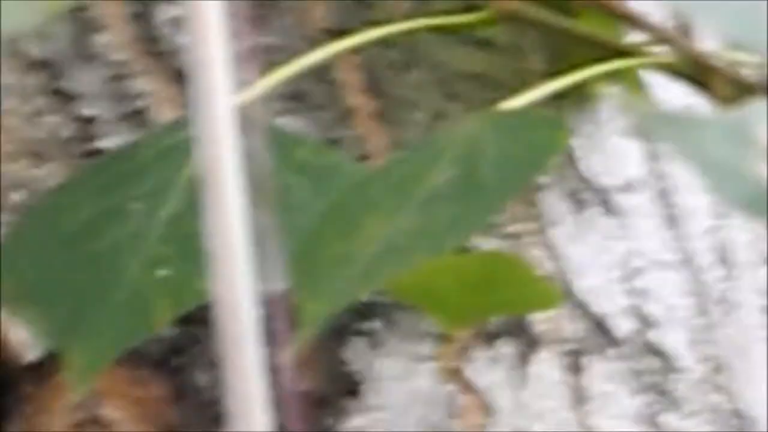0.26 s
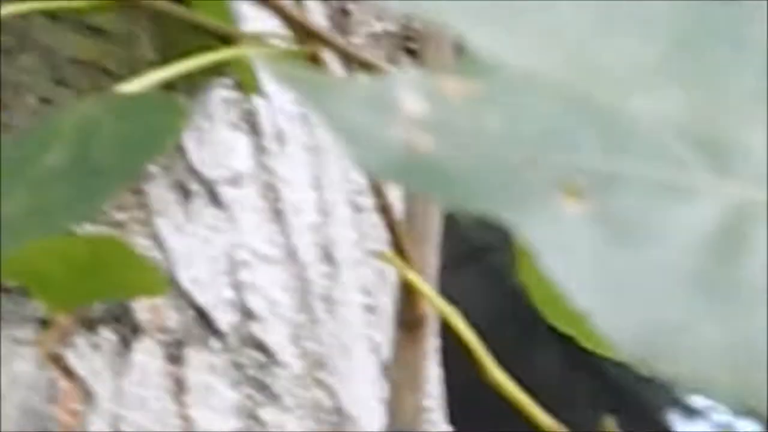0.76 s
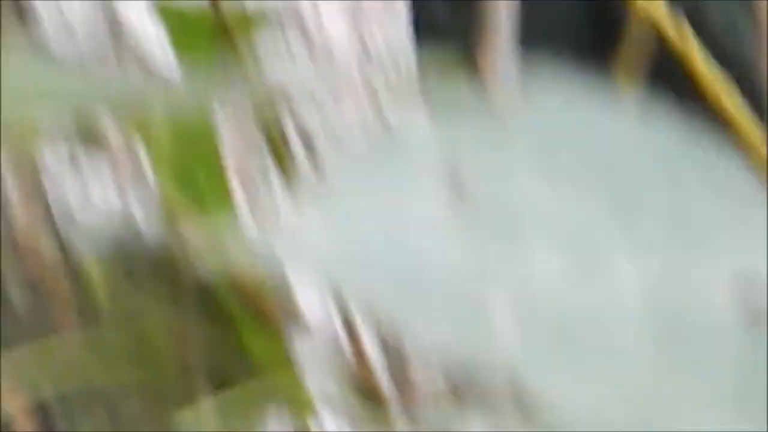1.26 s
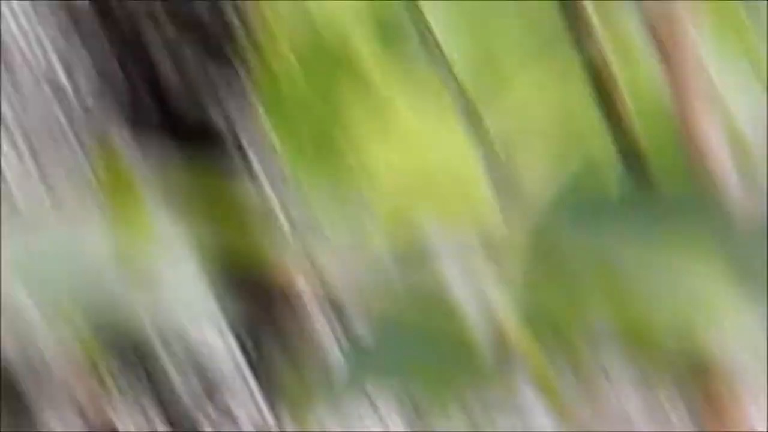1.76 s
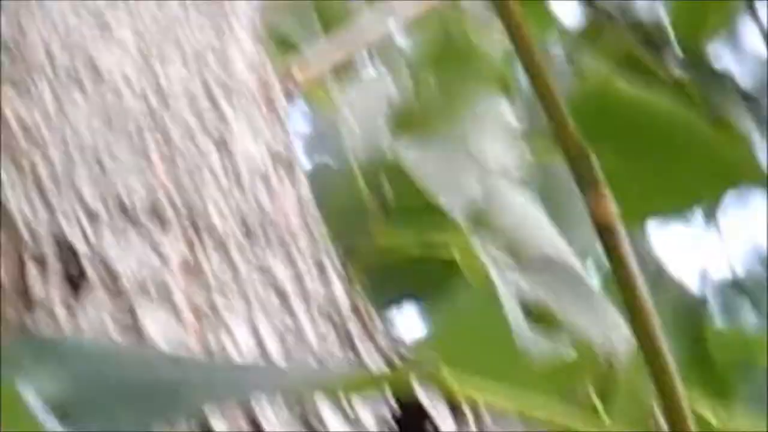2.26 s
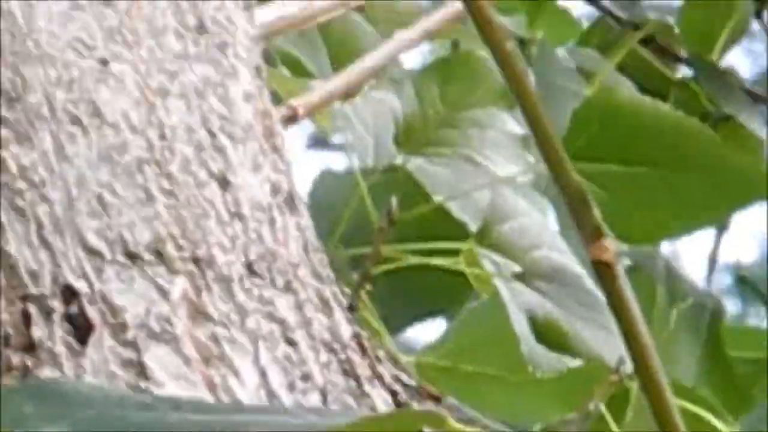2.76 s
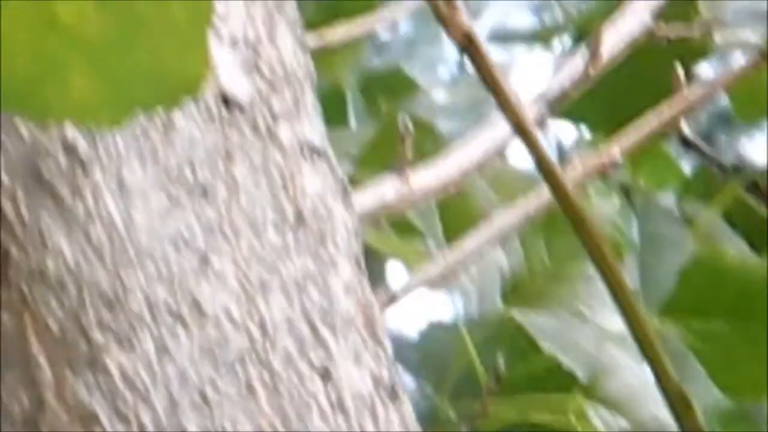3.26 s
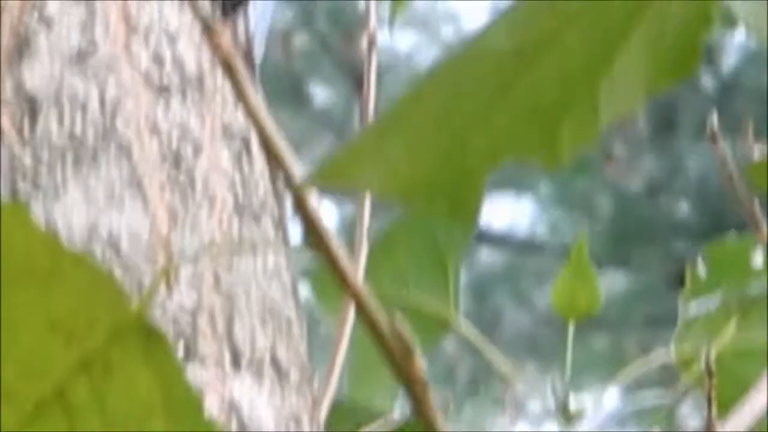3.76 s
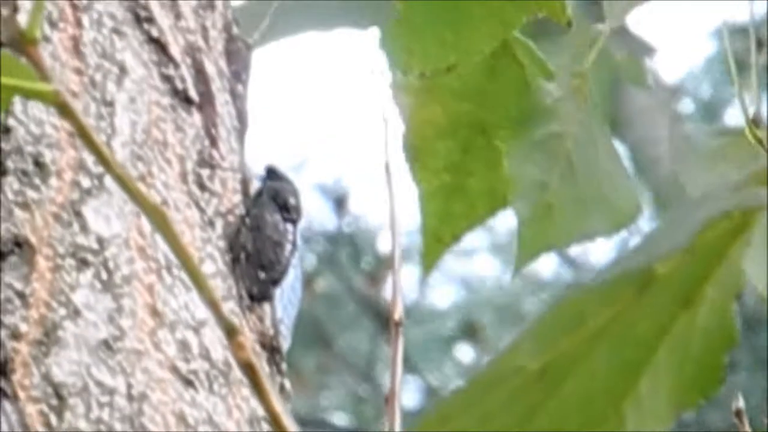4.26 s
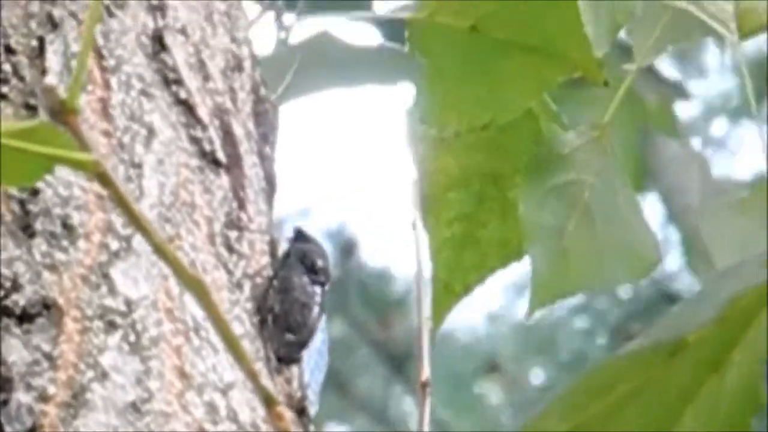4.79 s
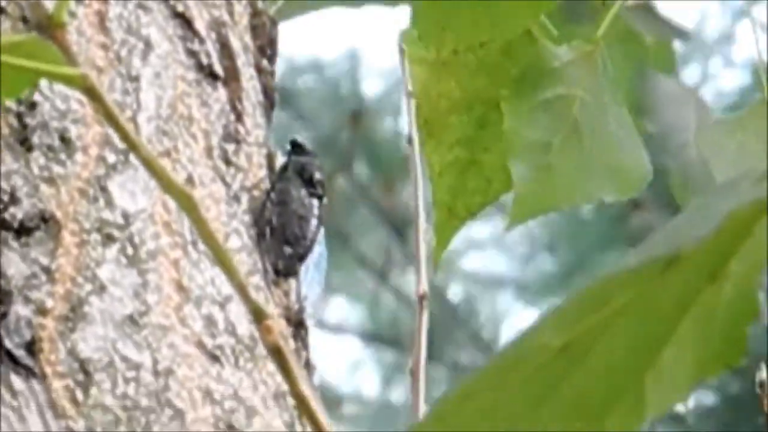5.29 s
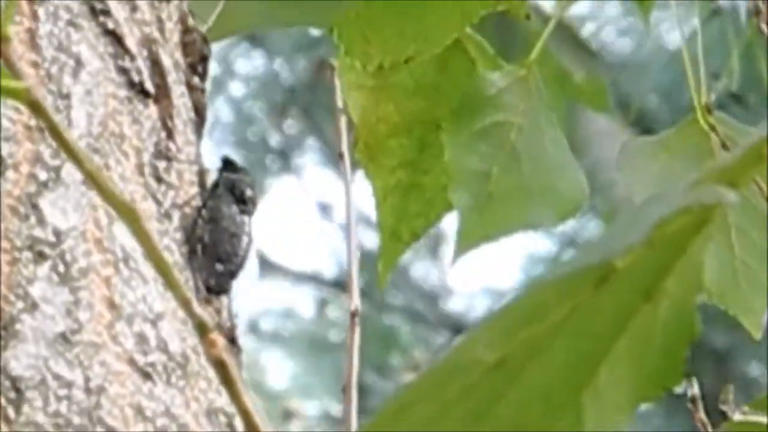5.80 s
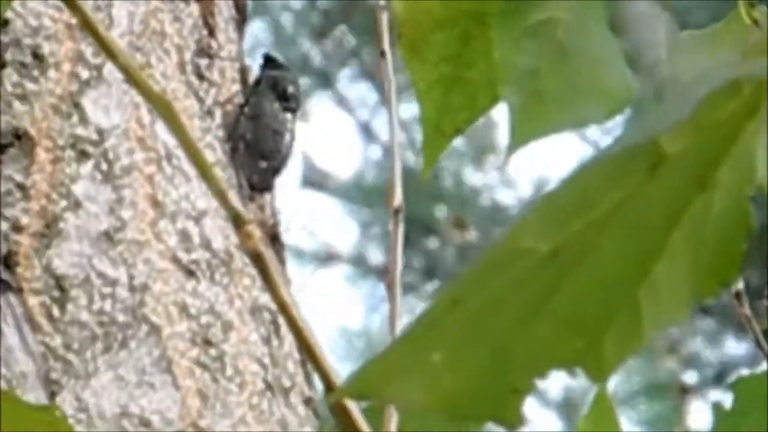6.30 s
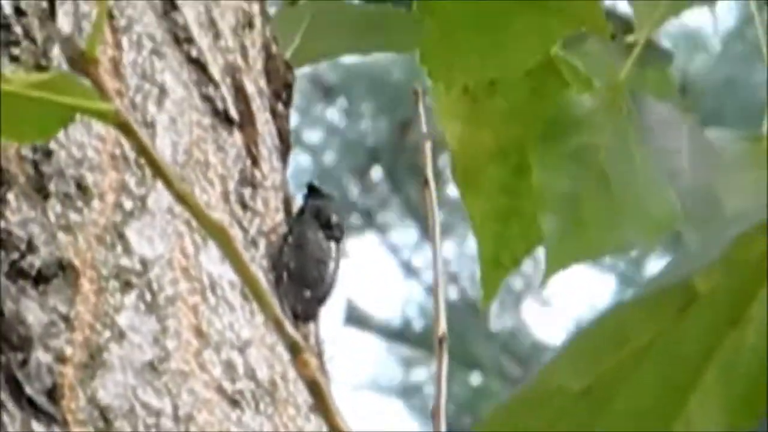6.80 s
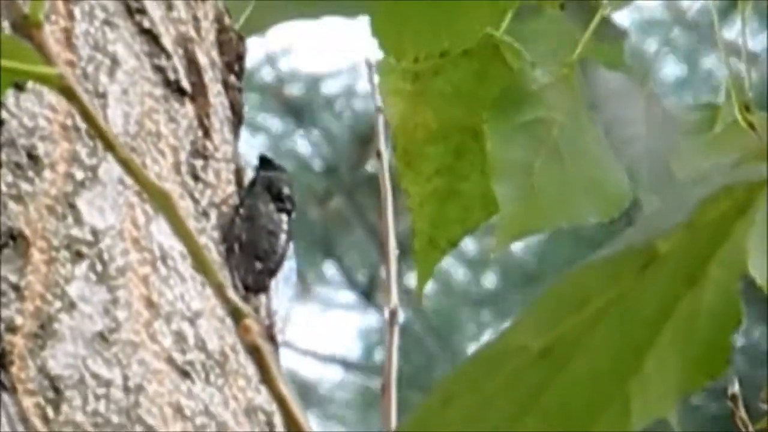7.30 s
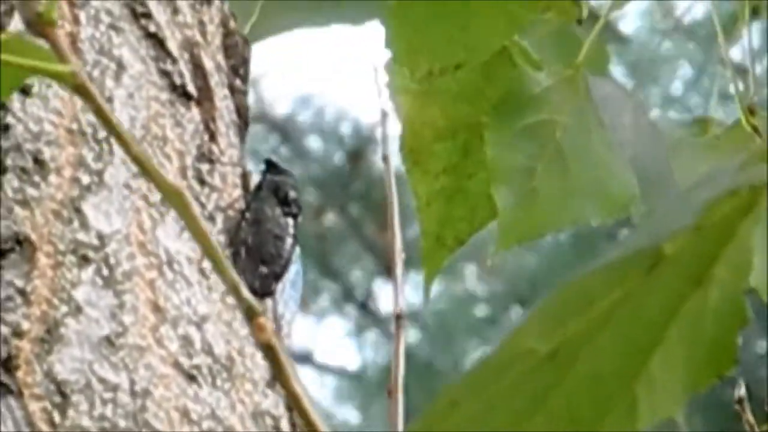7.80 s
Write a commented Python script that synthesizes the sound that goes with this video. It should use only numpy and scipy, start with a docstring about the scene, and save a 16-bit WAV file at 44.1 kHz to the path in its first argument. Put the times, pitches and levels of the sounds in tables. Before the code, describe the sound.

Outdoors by a leafy tree, distant traffic rumbles and far insects hiss and whine while fingers bump the small hand-held stereo microphone. A single cicada's raspy buzz rises through them in rapid pulses, each made of fast dry clicks that quicken and break off. After three seconds it is dominant, piercing and steady, with short dense reflections from trunk and leaves, and it never stops.

```python
"""Cicada on a tree trunk

A cicada swells into a throbbing buzz over a far trilling insect chorus and the roar of distant traffic.
Each throb is a train of paired drum-membrane clicks, ringing fixed modes, that speeds up and then breaks off.
Chorus and traffic are filtered noise; trunk and leaves add short, dense echoes to the song.
A small hand-held stereo microphone turns towards the tree and picks up handling thumps: knocks of ringing noise."""
import sys
import numpy as np
from scipy import signal
from scipy.fft import rfft, irfft
from scipy.io import wavfile
from scipy.ndimage import uniform_filter1d, map_coordinates

SR = 44100
rng = np.random.default_rng(int(sys.argv[2]) if len(sys.argv) > 2 else 0)


def undo_db(level):
    """Turn decibels back into plain size, where 20 dB means ten times bigger."""
    steps = np.asarray(level, float) / 20
    return 10 ** steps


def store_wav(level_fs):
    """Save 16-bit WAV to argv[1]."""
    pcm = np.round(np.clip(np.atleast_2d(level_fs), -1, 1) * 32767)
    wavfile.write(sys.argv[1], SR, pcm.T.astype(np.int16))


N = 355005
TIME_S = np.arange(N) / SR
FFT_HZ = np.fft.rfftfreq(N, 1 / SR)


def rms_one(x):
    """Scale to unit rms."""
    return x / np.sqrt(np.mean(x ** 2) + 1e-20)


def along(rows, at):
    """Read every column of a table at the given places of its first column."""
    first, *columns = np.transpose(rows)
    return [np.interp(at, first, c) for c in columns]


def at_hz(points, hz):
    """Read a spectrum on a log-frequency axis."""
    point_hz, value = np.array(points).T
    return np.interp(np.log(hz + 1), np.log(point_hz + 1), value)


def drift(rate_hz):
    """Slow random wander of rms 1: noise through two equal low-pass poles, computed every 40 samples."""
    r = np.exp(-80 * np.pi * rate_hz / SR)
    noise = rng.standard_normal(N // 40 + 2002)
    slow = signal.lfilter([1], [1, -2 * r, r * r], noise)[2000:]   # drop the filter's run-in
    return np.interp(np.arange(N) / 40, np.arange(len(slow)), rms_one(slow))


def resonance(x, hz, width_hz):
    """Two-pole resonance with a gain of 1 at its peak."""
    r = np.exp(-np.pi * width_hz / SR)
    poles = [1, -2 * r * np.cos(2 * np.pi * hz / SR), r * r]
    return signal.lfilter([(1 - r * r) / 2, 0, (r * r - 1) / 2], poles, x + 1e-18)


def coloured_noise(spectrum):
    """Stereo noise of a given spectrum, most alike in the bass and nearly unrelated in the treble; rms 1."""
    # how alike left and right are: (frequency [Hz], likeness [0-1])
    likeness = [(60, 0.78), (600, 0.72), (1000, 0.54), (1400, 0.29), (2200, 0.22), (3200, 0.035),
                (16000, 0.16)]
    mid, side = rfft(rng.standard_normal((2, N)))
    alike = np.clip(at_hz(likeness, FFT_HZ), 0, 1)
    pair = np.sqrt(1 + alike) * mid + np.sqrt(1 - alike) * side * [[1], [-1]]
    return rms_one(irfft(pair * undo_db(at_hz(spectrum, FFT_HZ)), N))


def distant_traffic():
    """Gusting rumble and unsteady roar of shaped noise, with an engine drone of resonant noise bands."""
    # sinking as the song swells, before gusts: (time [s], rumble [dB], roar [dB])
    background_levels = [(0, -48, -36), (.36, -45.5, -37.5), (.7, -47.5, -36.5), (1.5, -45, -35.5),
                         (2.5, -44.5, -36.5), (3.2, -45.5, -35.5), (3.8, -51, -37.5), (4.6, -53.5, -39.5),
                         (5.2, -53.5, -38.5), (6, -54.5, -40), (6.5, -52, -39.5), (7.6, -55.5, -39.5),
                         (7.76, -47, -38), (8.05, -53, -40)]
    # rumble spectrum: (frequency [Hz], relative level per Hz [dB])
    rumble_spectrum = [(12, -41), (20, -28), (54, 3.5), (86, -8), (110, -6.5), (140, -18), (240, -120)]
    # roar spectrum: (frequency [Hz], relative level per Hz [dB])
    roar_spectrum = [(53, -29), (90, -4.5), (120, -0.5), (152, -3), (245, -2), (372, -5), (533, -4.5),
                     (786, -3.5), (954, -1.5), (2370, -13.5), (3200, -14.5), (4160, -58), (7040, -120)]
    # engine drone bands: (centre [Hz], width [Hz], relative level [dB])
    drone_bands = [(520, 185, 0), (916, 170, -6.5)]
    # far sources; the drone column is used here:
    # (time [s], chorus hiss [dB], chorus whine [dB], engine drone gain [dB])
    drone_levels = [(0, -38, -39.5, -41.5), (.5, -37, -38.5, -41.5), (1, -36, -38, -40.5),
                    (1.5, -35, -36.5, -42.5), (2, -34, -37, -45.5), (3, -34, -36, -53.5),
                    (4, -36.5, -37, -58), (6, -40, -38, -52.5), (8.05, -41, -39, -66)]
    gust_db, gusts_hz = 2.5, 5.2   # rms depth and rate
    rumble_db, roar_db = along(background_levels, TIME_S)
    drone_db = along(drone_levels, TIME_S)[2]
    rumble = undo_db(rumble_db + gust_db * drift(gusts_hz)) * coloured_noise(rumble_spectrum)
    roar = undo_db(roar_db + 1.22 * drift(13.2)) * coloured_noise(roar_spectrum)
    drone = np.zeros(N)
    for hz, width_hz, band_db in drone_bands:
        band = rms_one(resonance(rng.standard_normal(N), hz, width_hz))
        drone += undo_db(band_db + 1.3 * drift(3.3)) * band
    return rumble + roar + undo_db(drone_db) * drone


def far_chorus():
    """Many far insects blur into shaped hiss and a narrow whine whose level flutters as a trill."""
    # chorus hiss spectrum: (frequency [Hz], relative level per Hz [dB])
    hiss_spectrum = [(2500, -17), (3500, -1.5), (5500, 1), (6800, 8), (8000, -10.5), (10000, 3),
                     (13000, -3.5), (15800, -20)]
    # far sources; the hiss and whine columns are used here:
    # (time [s], chorus hiss [dB], chorus whine [dB], engine drone gain [dB])
    chorus_levels = [(0, -38, -39.5, -41.5), (.5, -37, -38.5, -41.5), (1, -36, -38, -40.5),
                     (1.5, -35, -36.5, -42.5), (2, -34, -37, -45.5), (3, -34, -36, -53.5),
                     (4, -36.5, -37, -58), (6, -40, -38, -52.5), (8.05, -41, -39, -66)]
    whine_hz, stage_width_hz = 7320, 380
    hiss_db, whine_db, _ = along(chorus_levels, TIME_S)
    whine = resonance(rng.standard_normal((2, N)), whine_hz, stage_width_hz)
    whine = resonance(whine, whine_hz, stage_width_hz)
    hiss = undo_db(hiss_db) * coloured_noise(hiss_spectrum)
    return hiss + undo_db(whine_db + 1.1 * drift(40)) * rms_one(whine)


def thumps():
    """Short noisy knocks of fingers on the microphone body, each ringing one resonance."""
    # handling thumps, level before onset and decay, width of each of two filter stages:
    # (time [s], level [dB], resonance [Hz], t60 of the decay [s], width [Hz])
    knocks = [(.045, -30.5, 646, 0.12, 200), (.74, -30, 510, 0.11, 98), (1.1, -31, 1610, 0.12, 70),
              (1.48, -27, 65, 0.27, 15), (1.75, -30, 69.6, 0.13, 20), (2.045, -30, 520, 0.16, 140),
              (2.799, -29, 301, 0.092, 70), (3.34, -31, 630, 0.14, 450)]
    out = np.zeros(N)
    for start_s, knock_db, hz, t60_s, width_hz in knocks:
        i = round(start_s * SR)
        age = TIME_S[:min(12000, N - i)]
        knock = resonance(rng.standard_normal(len(age)), hz, width_hz)
        knock = resonance(knock, hz, width_hz)
        onset = np.minimum(age / 0.0038, 1)
        out[i:i + len(age)] += undo_db(knock_db - 60 * age / t60_s) * rms_one(knock) * onset
    return out


def leaf_echoes(song):
    """Dense short echoes off trunk and leaves, other ones at each port; they change as the leaves sway."""
    # colour of the echoes: (frequency [Hz], level against the direct sound [dB])
    echo_colour = [(3500, 1.5), (5000, -5.5), (6200, 2.5), (7200, -6.5), (8000, -7.5), (10000, -3.5),
                   (12000, -3.5), (15000, -0.5)]
    t60_s, delay_s, sway_hz = .035, .001, 1.0
    sway = np.pi / 2 * drift(sway_hz)
    song = irfft(rfft(song) * undo_db(at_hz(echo_colour, FFT_HZ)), N)
    age = np.arange(3000) / SR
    tails = rng.standard_normal((2, 2, len(age))) * undo_db(-60 * age / t60_s) * (age > delay_s)
    tails /= np.sqrt(np.sum(tails ** 2, axis=2, keepdims=True))
    echoes = np.zeros((2, N))
    # swaying shifts the song between two sets of echoes
    for share, tail in zip((np.cos(sway), np.sin(sway)), tails):
        echoes += signal.fftconvolve([song * share], tail, axes=1)[:, :N]
    return echoes


def turning_ports(song):
    """As the microphone turns, the song's arrival at the left port shifts against the right one."""
    # turn of the microphone: (time [s], delay of the song at the left port [microseconds])
    turn_delay = [(0, -34), (1.5, -21), (2.7, 13), (4, 17), (8.05, 22)]
    lag = along(turn_delay, TIME_S)[0] * SR / 1e6
    left = map_coordinates(song, [np.arange(N) - lag], order=5, mode="nearest")
    return np.array([left, song])


def cicada():
    """Membrane buckles in, springs out a moment later; both clicks ring the same modes with own strengths."""
    # pace of the song: (time [s], throbs begun so far [count])
    throb_count = [(-.061, 0), (.149, 2), (.38, 4), (.471, 5), (.884, 9), (1.077, 11), (1.282, 13),
                   (1.755, 18), (2.048, 21), (2.348, 24), (5.282, 55), (5.568, 58), (6.047, 63),
                   (6.727, 70), (7.124, 74), (8.143, 84)]
    # swell of the song: (time [s], level before the throb shape [dB], slump at the start of a throb [dB])
    song_swell = [(0, -35.5, -1), (.4, -33, -4.5), (.8, -32.5, -4), (1.3, -30.5, -5), (1.8, -27.5, -4.5),
                  (2.4, -26, -4.5), (2.8, -24.5, -5), (3.3, -23, -4), (4.3, -23.5, -3.5),
                  (5.4, -23.5, -3.3), (6.5, -23, -3.5), (8.05, -23, -2.5)]
    # clicks through one throb:
    # (phase [0-1], click pairs [1/s], gap inside a pair [ms], unsteadiness [share of a period])
    throb_clicks = [(0, 215, 1.7, .07), (.16, 215, 1.6, .06), (.28, 248, 1.42, .02), (.45, 270, 1.455, .01),
                    (.66, 286, 1.49, .01), (.75, 318, 1.505, .008), (.95, 358, 1.55, .01),
                    (1, 368, 1.55, .03)]
    # loudness through one throb: (phase [0-1], effort [dB], share of the slump [0-1], low modes [dB])
    throb_shape = [(0, -0.5, 1, 4), (.17, -1, 1, 2), (.3, -0.5, .2, -.5), (.4, -1, 0, 0.5),
                   (.65, -.5, 0, 0.5), (.8, 1, 0, 0), (.92, -0.07, 0.04, 1.5), (.97, -2, .1, 4),
                   (1, -4.5, .6, 7)]
    # upper membrane and air-sac modes: (frequency [Hz], width [Hz], buckling in [dB], springing out [dB])
    high_modes = [(6310, 210, -9.5, -11), (6670, 300, -1, -13), (7490, 1110, -0.5, -6), (8146, 920, 0.5, 0),
                  (9210, 730, -7.5, -1), (10240, 1100, -15.5, -11.5), (12700, 2900, -27, -19),
                  (14400, 1400, -20, -23), (15500, 900, -26, -25)]
    # lower modes: (frequency [Hz], width [Hz], buckling in [dB], springing out [dB])
    low_modes = [(3450, 530, -32, -31), (3730, 296, -16, -20.5), (4262, 246, -7.5, -16),
                 (4690, 510, -7.5, -17.5), (5190, 670, -8, -22), (5650, 560, -7.5, -24)]
    click_spread_db, mode_spread_db = 1.1, .8
    throb_spread_db, slump_spread_db = 0.52, 0.84
    rib_clicks_per_s, rib_db = 1500, -24   # level against the stronger main click
    skirt_hz = 4000   # high-pass below the upper modes
    low_growth, full_voice_db = 0.34, -20.5   # dB per dB of swell, and the level where it adds nothing

    phase, = along(throb_count, TIME_S)
    level_db, slump_db = along(song_swell, TIME_S)
    # each throb differs a little
    chance = rng.standard_normal((int(phase[-1]) + 1, 2))[phase.astype(int)]
    pairs_per_s, gap_ms, unsteady = along(throb_clicks, phase % 1)
    effort_db, slumped, low_db = along(throb_shape, phase % 1)

    pairs = np.cumsum(pairs_per_s * (1 + .012 * drift(5))) / SR
    inward = np.flatnonzero(np.diff(pairs.astype(int)))
    period_spread = (unsteady / pairs_per_s * SR)[inward, None]
    slip = rng.standard_normal((len(inward), 2)) * period_spread
    # a pair slips as a whole; its gap varies half as much, so the pair draws gliding fringes
    outward = inward + gap_ms[inward] * SR / 1000 + .5 * slip[:, 1]
    times = np.clip([inward, outward] + slip[:, 0], 0, N - 1).astype(int)
    size_db = click_spread_db * rng.standard_normal(times.shape)
    # ribs of the membrane snap one by one between the main clicks
    snaps = rng.random(N) < rib_clicks_per_s / SR
    ribs = snaps * rng.standard_normal(N) * undo_db(rib_db)

    voices = np.zeros((2, N))
    for group, modes in enumerate((high_modes, low_modes)):
        for k, (hz, width_hz, in_db, out_db) in enumerate(modes):
            clicks = ribs * undo_db(max(in_db, out_db))
            mode_db = mode_spread_db * rng.standard_normal(times.shape)
            clicks[times] = undo_db(size_db + [[in_db], [out_db]] + mode_db)
            # two stages 1.5 times as wide give about the listed width together
            rung = resonance(clicks, hz, 1.5 * width_hz)
            rung = resonance(rung, hz, 1.5 * width_hz)
            voices[group] += rung * (-1) ** k
    high, low = voices
    high = signal.sosfilt(signal.butter(4, skirt_hz, "high", fs=SR, output="sos"), high)
    # the low modes speak more as the voice swells
    low = low * undo_db(low_db + low_growth * (level_db - full_voice_db))
    slump = slumped * (slump_db + slump_spread_db * chance[:, 1])
    envelope_db = level_db + throb_spread_db * chance[:, 0] + effort_db + slump
    return rms_one(high + low) * undo_db(uniform_filter1d(envelope_db, size=130))


def dips():
    """Gain of the whole level in time: each brief dip falls fast and recovers slowly."""
    # brief dips, depth before fall and recovery shape them: (time [s], depth [dB])
    brief_dips = [(3.11, -2.5), (3.39, -3), (3.48, -2), (3.765, -2.5), (4.05, -3), (4.15, -1),
                  (4.809, -2.5), (5.09, -1.5), (5.565, -3), (5.95, -1), (6.239, -1), (6.53, -3),
                  (7.425, -3.5)]
    fall_s, recovery_s = 0.0027, .1   # time constants
    start_s, depth_db = np.transpose(brief_dips)[:, :, None]
    age = np.maximum(np.arange(0, N + 40, 40) / SR - start_s, 0)
    shape = (1 - np.exp(-age / fall_s)) * np.exp(-age / recovery_s)
    db = np.sum(depth_db * shape, axis=0)
    return undo_db(np.interp(np.arange(N) / 40, np.arange(len(db)), db))


def scene():
    """Song with its echoes over chorus, traffic and thumps."""
    song = cicada()
    near = turning_ports(song) + leaf_echoes(song)
    return near + far_chorus() + distant_traffic() + thumps()


def low_pass(x):
    """Removes everything above the highest recorded frequency."""
    return signal.sosfilt(signal.butter(12, 15900, fs=SR, output="sos"), x)


def record(dry):
    """Microphone: level dips, ports of unlike colour, a left all-pass, a steep treble limit and a notch."""
    # colour of the ports: (frequency [Hz], left minus right [dB])
    port_balance = [(60, -5), (110, -4), (200, -2.5), (380, -3), (700, -4), (1290, -5.5), (2380, -5),
                    (4400, -2.5), (8120, -2), (15000, -7.5)]
    tilt = undo_db(at_hz(port_balance, FFT_HZ) / 2)
    left, right = irfft(rfft(dry * dips()) * [tilt, 1 / tilt], N)
    # the all-pass turns the left channel's phase a full cycle through the middle band
    turn_hz, turn_width_hz = 2160, 1320
    r = np.exp(-np.pi * turn_width_hz / SR)
    poles = [1, -2 * r * np.cos(2 * np.pi * turn_hz / SR), r * r]
    left = signal.lfilter(poles[::-1], poles, left)
    treble_limit = signal.ellip(12, .5, 55, 15760, fs=SR, output="sos")   # low-pass edge in Hz
    pair = signal.sosfilt(treble_limit, [left, right])
    # a narrow dip in the microphone's response: 8845 Hz, 64 Hz wide, 0.8 of the peak taken out
    pair = pair - .8 * resonance(pair, 8845, 64)
    return low_pass(pair)


dry = scene()
out = record(dry)
store_wav(out)
```